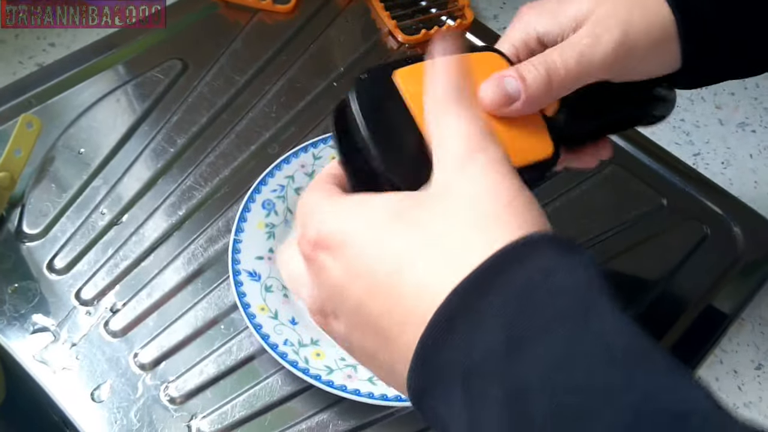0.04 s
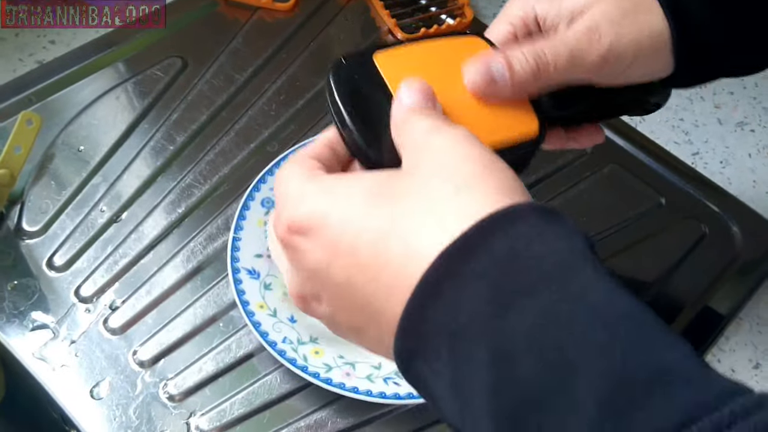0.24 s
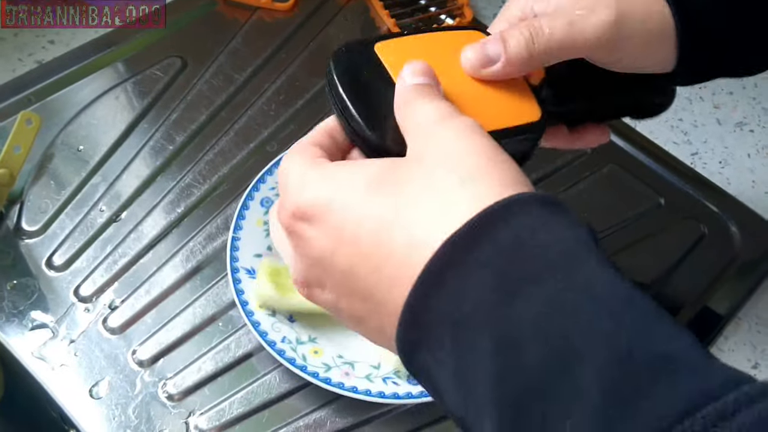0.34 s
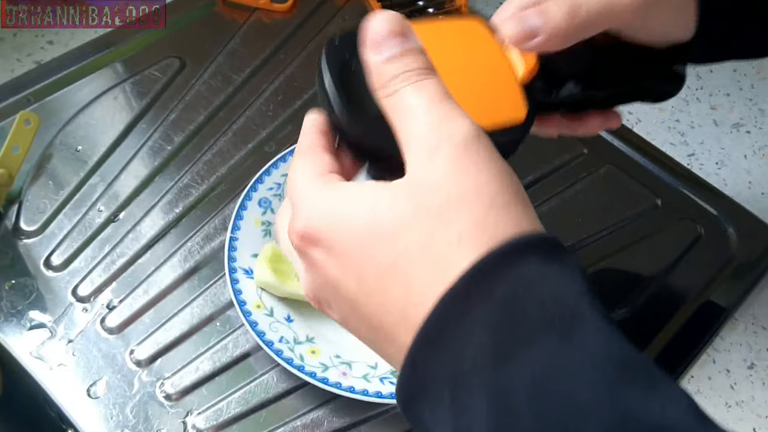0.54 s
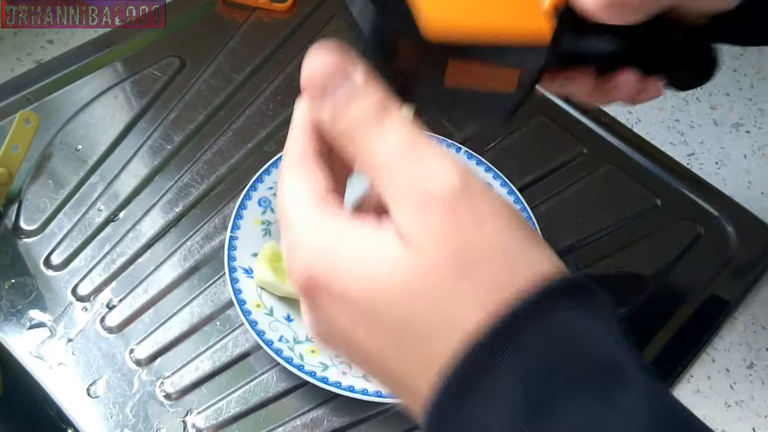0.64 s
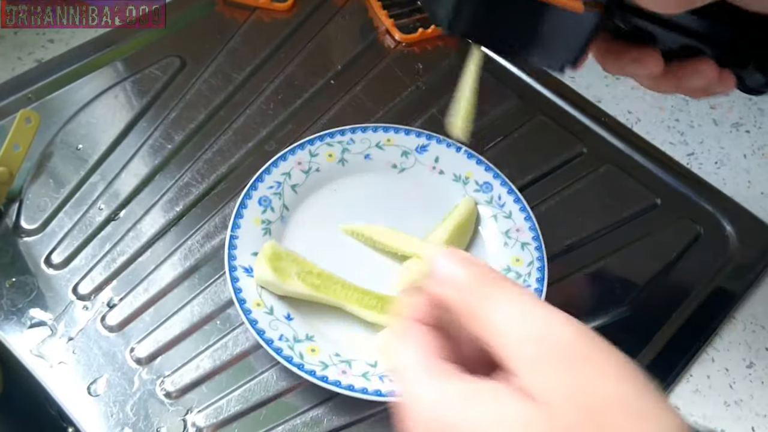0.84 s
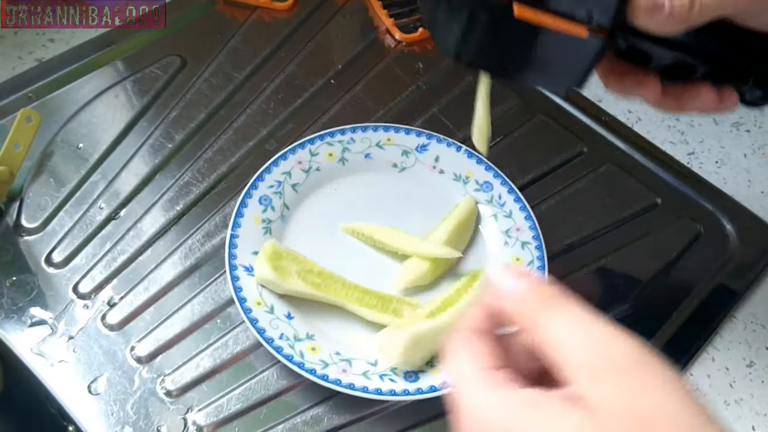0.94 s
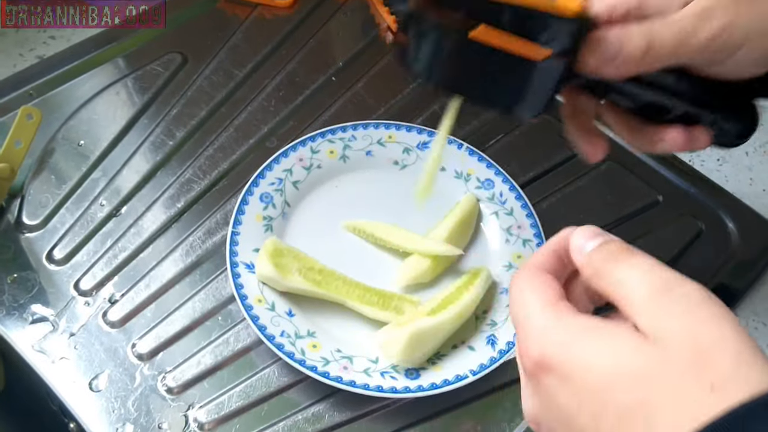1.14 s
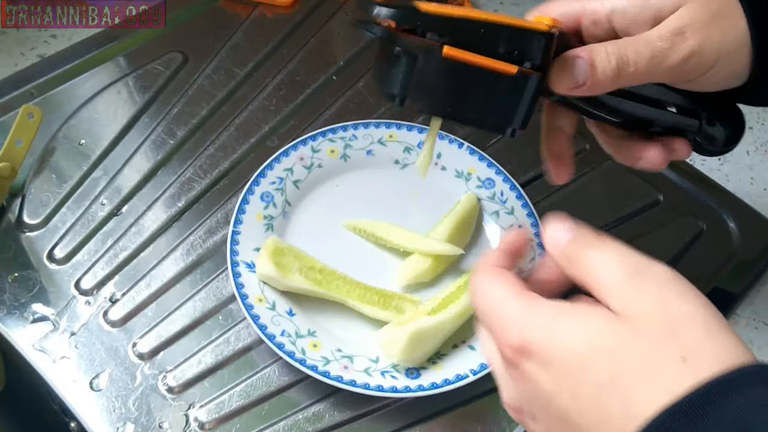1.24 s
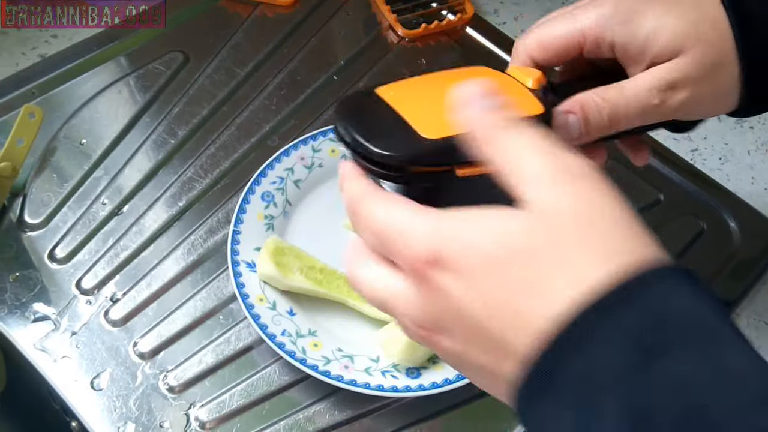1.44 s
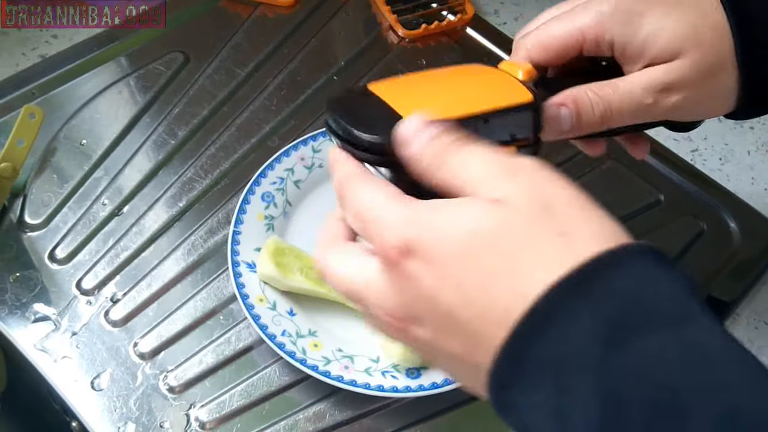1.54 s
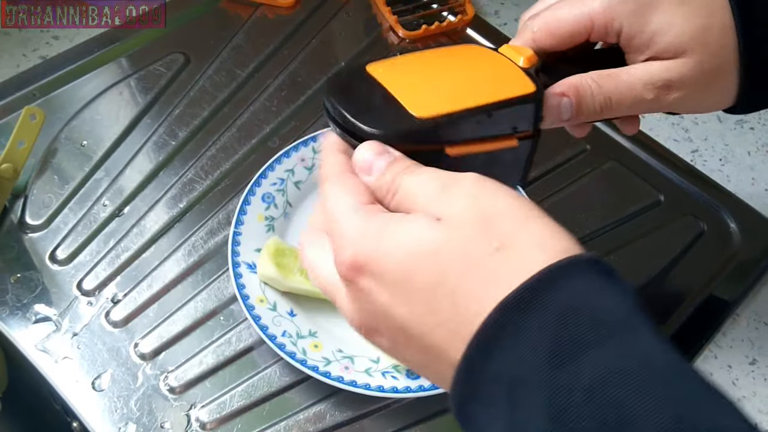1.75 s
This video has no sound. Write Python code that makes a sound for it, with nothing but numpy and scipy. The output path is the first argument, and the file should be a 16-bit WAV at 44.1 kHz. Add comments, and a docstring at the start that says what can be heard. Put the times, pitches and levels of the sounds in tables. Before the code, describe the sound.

A plastic hand slicer snaps and clacks shut through a cucumber, followed by faint ticks.

```python
"""A plastic hand slicer is pressed shut through a cucumber, over a steel sink in a small kitchen.
Over a low room rumble, the lid snaps loose at about 0.2 s. The blades crunch through the flesh,
bursting its cells, and near 0.4 s the lid slams home and the hollow body booms in its normal modes.
The low boom dies away faster from about 0.63 s. Around 1 s the wet slices rustle out,
and from 1.3 s the plastic ticks in the hand."""
import sys
import numpy as np
from scipy import signal
from scipy.fft import rfft, irfft, next_fast_len
from scipy.io import wavfile
from scipy.ndimage import uniform_filter1d

SR = 44100
rng = np.random.default_rng(int(sys.argv[2]) if len(sys.argv) > 2 else 0)


def dump_mix(stems):
    """Bounce the given channels to the path in sys.argv[1] as a 16-bit WAV at rate SR."""
    frames = np.atleast_2d(stems).T  # one column per channel
    limited = np.clip(frames, -1, 1)  # hard clip at full scale
    pcm = np.round(limited * 32767).astype(np.int16)
    wavfile.write(sys.argv[1], SR, pcm)


N = 79380
T = np.arange(N) / SR
FFT_SIZE = next_fast_len(2 * N)
HZ = np.fft.rfftfreq(FFT_SIZE, 1 / SR)

# kitchen reverberation (frequency [Hz], T60 [s])
KITCHEN_T60 = [(80, 0.72), (300, 0.5), (700, 0.43), (2500, 0.39), (6000, 0.31), (15000, .27)]
# likeness of left and right (frequency [Hz], correlation [0-1])
COHERENCE = [(50, 1), (250, 0.78), (600, 1), (1300, 0.16), (4000, 0.22), (15000, 0.047)]
# stereo balance (frequency [Hz], left minus right [dB])
BALANCE = [(60, -5), (200, -8), (380, -9.5), (750, -4), (2000, -5.5), (4400, -8), (8000, -5), (15000, -3)]

# spectra of the noisy sources (frequency [Hz], relative spectral density [dB])
RUMBLE_SPECTRUM = [(20, -28.5), (35, -14), (50, 3), (85, 1), (125, -8.5), (170, -4), (300, -14), (390, -21),
                   (480, -36), (650, -49), (1500, -61)]
HISS_SPECTRUM = [(400, -6.5), (1000, -3), (3000, -11), (10000, -10), (15000, -23.5)]
BUMP_SPECTRUM = [(25, -12.5), (60, 3), (100, 0.5), (160, -1), (300, -7), (480, -19), (900, -45.5)]
RUSTLE_SPECTRUM = [(2000, -34), (5000, -21), (6500, -3.5), (7600, -8.5), (9000, 0.5), (10500, -4.5),
                   (12500, -13.5), (15500, -32)]
TICK_SPECTRUM = [(1500, -23), (3800, -31), (4500, 1), (8500, -2), (11400, -5.5), (12300, -8), (14200, -11),
                 (15500, -18)]
KNOCK_SPECTRUM = [(25, -32.5), (60, -2), (110, -7), (200, 3.5), (320, -3), (500, -13), (900, -20),
                  (3000, -62)]
CUT_SPECTRUM = [(30, -25), (150, 1.5), (300, 8.5), (600, -1.5), (1200, -0.5), (2600, -1.5), (5200, -4),
                (9000, -6.5), (10600, -14.5), (12000, -26), (15500, -35.5)]
SNAP_SPECTRUM = [(59, -55), (100, -28), (293, -11), (614, -24), (1040, -9.5), (1230, -11.5), (2090, -5.5),
                 (2370, -7), (3390, -11.5), (5750, -6.5), (9340, -5), (15500, -33)]
SLAM_SPECTRUM = [(60, -23), (180, -6), (300, -4), (550, 3), (750, -5.5), (1150, -6), (1440, 0),
                 (1750, -12.5), (2200, 2), (3300, -9.5), (7000, -4.5), (9500, -7.5), (10800, -14),
                 (12200, -24.5), (15500, -35)]

# slow swell of the rumble (time [s], level [dB])
RUMBLE_LEVEL = [(0, -44.5), (.7, -50.5), (.82, -41.5), (.96, -47), (1.12, -45.5), (1.28, -48), (1.4, -51),
                (1.6, -45.5), (1.8, -52)]
# faint tones (peak time [s], width [s], frequency [Hz], level [dB])
HUM_SWELLS = [(0.718, 0.047, 870, -60), (.78, 0.08, 283, -48.5), (1.185, 0.0715, 376, -49.5),
              (1.16, 0.12, 400, -57)]
# hands shifting their grip (time [s], level [dB])
HAND_BUMPS = [(0.164, -33), (0.259, -26.5), (0.766, -35), (1.285, -37.5), (1.546, -46)]
# wet slices sliding (time [s], level [dB])
RUSTLE_LEVEL = [(.72, -68), (.8, -69), (.94, -61.5), (.98, -58.5), (1.03, -61.5), (1.08, -73), (1.13, -96)]
# plastic ticking (time [s], level [dB], rise [s], T60 [s], low ring [Hz], high ring [Hz])
PLASTIC_TICKS = [(1.277, -54.5, 0.0036, 0.034, 3900, 7270), (1.284, -53.5, 0.0015, 0.067, 2450, 5300),
                 (1.314, -56.5, 0.015, 0.3, 7130, 10200), (1.345, -53, 0.0049, 0.035, 4240, 5700),
                 (1.355, -47, 0.0051, 0.097, 5020, 8590), (1.44, -58, 0.0015, 0.044, 2070, 2900),
                 (1.444, -52, 0.0029, 0.081, 5080, 6840), (1.5, -60.5, 0.0058, 0.52, 5260, 9050),
                 (1.5409, -42, 0.0016, 0.058, 4780, 6570), (1.547, -42, 0.0069, 0.06, 3200, 8970)]
# resonances of handle and frame (frequency [Hz], relative level [dB])
FRAME_RESONANCES = [(4200, -2.5), (4730, -14), (5020, -8.5), (5735, 4.5), (6570, -1.5), (7340, 4.5),
                    (8600, -3), (9130, 5.5), (9870, -4), (10300, 2), (11190, -0.5), (14000, -14)]
# pushes on the hollow body (time [s], boom level [dB], knock level [dB])
PUSHES = [(.278, -23, -25.5), (0.312, -28, -18.5), (0.344, -30.5, -22.5), (.384, -17.5, -9),
          (0.4198, -24.5, -10), (0.4642, -34.5, -21.5)]
# modes of the hollow body (frequency [Hz], relative level [dB], T60 [s])
BODY_MODES = [(93.6, 3.5, 1.2), (186.2, -5.5, 0.69), (216.7, 1, 0.73), (254.7, -3.5, 0.57),
              (295.2, -2.5, 1.2), (381.4, -18.5, .33), (530, -9.5, 0.28), (629.6, -9, 0.66),
              (890, -21.5, 0.067), (991, -19.5, 0.88)]
# blades passing through the flesh (time [s], level [dB])
CUT_LEVEL = [(.255, -46.5), (.28, -28), (.315, -21), (.342, -19), (.362, -31.5), (.39, -20.5), (.42, -21.5),
             (.47, -23.5), (.52, -29), (.55, -52)]
# larger pieces of flesh and skin giving way (time [s], level [dB])
FRACTURES = [(0.2864, -15), (0.3069, -14), (0.3176, -14), (0.3423, -13), (0.3958, -13.5), (.4635, -16.5),
             (0.5221, -22)]
# latch letting go and catching (time [s], level [dB], band centre [Hz])
LATCH_CLICKS = [(0.205, -28, 7400), (0.2237, -10, 4400), (0.2273, -9.5, 5670), (0.2346, -7.5, 3254),
                (0.4202, -14.5, 7050)]
# resonances of the lid (frequency [Hz], relative level [dB])
LID_RESONANCES = [(2100, -7.5), (2250, 1), (2983, -5.5), (3850, -1), (4533, -4.5), (5790, -2.5), (5957, -1),
                  (7340, 0), (8190, -6)]
# lid snapping loose, then striking the frame (time [s], level [dB], T60 [s])
LID_SNAPS = [(.1632, -20, 0.064), (.2185, -22.5, 0.096), (.2245, -8.5, 0.045), (.2362, -5.5, 0.059)]
LID_SLAMS = [(.333, -19.5, 0.034), (.395, -17.5, 0.048), (.4205, -11.5, 0.17), (.436, -10, 0.057),
             (.511, -20.5, 0.035)]


def amp(db):
    """Amplitude ratio: tenfold for every 20 dB."""
    return 10 ** (np.asarray(db) / 20)


def unit(x):
    """Normalisation to an rms of 1."""
    return x / np.sqrt(np.mean(x ** 2) + 1e-20)


def at_frequency(points, hz):
    """Interpolation on a logarithmic frequency axis."""
    table_hz, values = np.transpose(points)
    return np.interp(np.log(hz + 1), np.log(table_hz + 1), values)


def level_curve(points):
    """Amplitude envelope interpolated in decibels, silent outside its span."""
    times, db = np.transpose(points)
    return amp(np.interp(T, times, db)) * (T > times[0]) * (T < times[-1])


def strike(start, rise, t60):
    """Transient envelope: a quick rise and an exponential decay of 60 dB in t60 seconds."""
    age = np.maximum(T - start, 0)
    return (1 - np.exp(-age / rise)) * np.exp(-np.log(1000) * age / t60)


def grit(spread_db):
    """Random amplitude modulation: stereo noise whose strength jumps about every millisecond."""
    grain = amp(spread_db * unit(uniform_filter1d(rng.standard_normal(N), size=40)))
    return unit(rng.standard_normal((2, N)) * grain)


def wandering_tone(hz, width_hz):
    """Narrow-band noise is heard as a tone of wandering strength and phase."""
    spectrum = rfft(rng.standard_normal(N), FFT_SIZE) * np.exp(-((HZ - hz) / width_hz) ** 2 / 2)
    band = signal.hilbert(irfft(spectrum, FFT_SIZE))[:N]
    return unit(band.real / np.sqrt(abs(band) + 1e-12))


def colour(x, spectrum):
    """Minimum-phase filtering: causal, and keeps the power of white noise."""
    log_gain = np.log(np.maximum(unit(amp(at_frequency(spectrum, HZ))), 1e-5))
    cepstrum = irfft(log_gain, FFT_SIZE)[:FFT_SIZE // 2]
    response = np.exp(rfft(2 * cepstrum, FFT_SIZE) - cepstrum[0])
    return irfft(rfft(x, FFT_SIZE) * response, FFT_SIZE)[:, :N]


def resonate(x, modes, width_hz):
    """Forced resonance of parallel modes, keeping roughly the power of white noise."""
    ring = 0
    for k, (hz, db) in enumerate(modes):
        resonator = signal.iirpeak(hz, hz / width_hz, fs=SR)
        ring += (-1) ** k * amp(db) * signal.lfilter(*resonator, x + 1e-18)
    return ring / np.sqrt(sum(amp(db) ** 2 for _, db in modes) * np.pi * width_hz / SR)


def cohere(x):
    """Spatial coherence: two nearby points receive much the same bass but unrelated treble."""
    spectra = rfft(x, FFT_SIZE)
    angle = np.arcsin(np.clip(at_frequency(COHERENCE, HZ), 0, 1)) / 2
    return irfft(spectra * np.cos(angle) + spectra[::-1] * np.sin(angle), FFT_SIZE)[:, :N]


def kitchen(x, wet_db, build_s):
    """Reverberation: a diffuse tail builds up, then dies soonest in the treble."""
    hz, age, spectra = signal.stft(rng.standard_normal((2, N)), SR, nperseg=256)
    decay = np.exp(-np.log(1000) * age / at_frequency(KITCHEN_T60, hz)[:, None])
    tail = signal.istft(spectra * decay, SR, nperseg=256)[1][:, :N]
    tail = unit(tail * (1 - np.exp(-(T / build_s) ** 2))) / np.sqrt(N)
    return x + amp(wet_db) * signal.fftconvolve(x, tail, axes=1)[:, :N]


def background():
    """Ambient noise: a swelling rumble, a thin hiss and faint narrow-band hums."""
    swell = amp(np.interp(T, *np.transpose(RUMBLE_LEVEL)))
    rumble = swell * colour(rng.standard_normal((2, N)), RUMBLE_SPECTRUM)
    hiss = amp(-67) * colour(rng.standard_normal((2, N)), HISS_SPECTRUM)
    hums = sum(amp(db) * np.exp(-((T - peak) / width) ** 2) * wandering_tone(hz, width_hz=6.0)
               for peak, width, hz, db in HUM_SWELLS)
    return cohere(rumble + hiss) + hums


def hand_bumps():
    """Soft impacts carry mostly low frequencies: the hands thud as they shift their grip."""
    envelope = sum(amp(db) * strike(start, rise=0.0038, t60=0.04) for start, db in HAND_BUMPS)
    return colour(envelope * rng.standard_normal((2, N)), BUMP_SPECTRUM)


def slice_rustle():
    """Sliding friction: the wet slices give a high, grainy noise as they slip out."""
    return colour(level_curve(RUSTLE_LEVEL) * grit(spread_db=1.8), RUSTLE_SPECTRUM)


def plastic_ticks():
    """Frictional excitation: small scrapes ring the frame and two hollow spots near the fingers."""
    grip_detune, grip_spread_db = 0.012, 3  # the grip alters the frame's modes from tick to tick
    scrapes, rings = np.zeros((2, 2, N))
    friction = grit(spread_db=1.37)
    grips = rng.uniform(-1, 1, (len(PLASTIC_TICKS), len(FRAME_RESONANCES) + 1))
    for (start, db, rise, t60, low_hz, high_hz), (shift, *offsets) in zip(PLASTIC_TICKS, grips):
        scrape = friction * amp(db) * strike(start, rise, t60)
        frame_modes = [(hz * (1 + grip_detune * shift), mode_db + grip_spread_db * offset)
                       for (hz, mode_db), offset in zip(FRAME_RESONANCES, offsets)]
        rings += resonate(scrape, frame_modes, width_hz=110)
        rings += resonate(scrape, [(low_hz, 0), (high_hz, 0)], width_hz=79)
        scrapes += scrape
    ticks = rings + amp(-2.5) * colour(scrapes, TICK_SPECTRUM)
    return kitchen(ticks, wet_db=-4.5, build_s=0.01)


def body_knocks():
    """Impact noise: the dull, toneless part of each push."""
    envelope = sum(amp(db) * strike(start, rise=0.0015, t60=0.12) for start, _, db in PUSHES)
    knocks = colour(envelope * grit(spread_db=0.93), KNOCK_SPECTRUM)
    return kitchen(knocks, wet_db=-6.5, build_s=0.018)


def body_boom():
    """Modal superposition: each push rings the hollow body; the boom dies away faster from 0.63 s."""
    rise_s, fade_start_s, fade_db_per_s = 0.0051, 0.63, 160
    ring = np.zeros(N)
    for start, push_db, _ in PUSHES:
        for hz, mode_db, t60 in BODY_MODES:
            envelope = amp(push_db + mode_db) * strike(start, rise_s, t60)
            ring += envelope * np.sin(2 * np.pi * hz * (T - start))
    return ring * amp(-fade_db_per_s * np.maximum(T - fade_start_s, 0))


def cucumber_crunch():
    """Shot noise: countless cells burst under the blades; now and then a larger piece gives way."""
    cells_per_s, size_spread_db = 6000, 5
    sizes = amp(size_spread_db * np.minimum(rng.exponential(1, (2, N)), 4))
    signs = rng.choice([-1, 1], (2, N))
    bursting = rng.random((2, N)) < cells_per_s / SR
    fracture_power = sum((amp(db) * strike(start, rise=0.000067, t60=0.011)) ** 2
                         for start, db in FRACTURES)
    envelope = np.sqrt(level_curve(CUT_LEVEL) ** 2 + fracture_power)
    crunch = colour(unit(sizes * signs * bursting) * envelope, CUT_SPECTRUM)
    return kitchen(crunch, wet_db=-3.5, build_s=0.0071)


def catch_ring():
    """Free vibration: one mode of the catch rings briefly at the end of the stroke."""
    start, hz = 0.4205, 1447
    return amp(-15.5) * strike(start, rise=0.001, t60=0.17) * np.sin(2 * np.pi * hz * (T - start))


def latch_clicks():
    """Brief contact gives a broad band: the hard edges of the latch let go and catch."""
    noise = rng.standard_normal((2, N))
    clicks = np.zeros((2, N))
    for start, db, hz in LATCH_CLICKS:
        burst = noise * amp(db) * strike(start, rise=0.000095, t60=0.016)
        clicks += resonate(burst, [(hz, 0)], width_hz=2600)
    return colour(clicks, SNAP_SPECTRUM)


def lid_impacts(impacts, spectrum, detune):
    """Impact excitation: gritty bursts add in power and ring the lid's modes."""
    power = sum((amp(db) * strike(start, rise=0.0016, t60=t60)) ** 2 for start, db, t60 in impacts)
    bursts = np.sqrt(power) * grit(spread_db=-0.6)
    modes = [(hz * (1 + detune), db) for hz, db in LID_RESONANCES]
    return colour(bursts, spectrum) + amp(-7.5) * resonate(bursts, modes, width_hz=36)


def lid():
    """Contact shifts resonances: the lid snaps loose brightly, then clacks lower against the frame."""
    snaps = lid_impacts(LID_SNAPS, SNAP_SPECTRUM, detune=0) + latch_clicks()
    snaps = kitchen(snaps, wet_db=-3.5, build_s=0.0031)
    slams = lid_impacts(LID_SLAMS, SLAM_SPECTRUM, detune=-0.028)
    return snaps + kitchen(slams, wet_db=-4.0, build_s=0.0082)


def scene():
    """Superposition of all sources; a higher level on the right places them to that side."""
    stroke = cohere(lid() + cucumber_crunch() + body_knocks() + hand_bumps())
    handling = cohere(plastic_ticks() + slice_rustle())
    mix = stroke + body_boom() + catch_ring() + handling + background()
    half_db = at_frequency(BALANCE, HZ) / 2
    gains = amp([half_db, -half_db])
    gains /= np.sqrt(np.mean(gains ** 2, axis=0))  # constant total power
    return irfft(rfft(mix, FFT_SIZE) * gains, FFT_SIZE)[:, :N]


def suppress_noise(x):
    """Spectral gating: every faint frequency is lowered, which cuts the tails short."""
    threshold_db, depth_db, smoothing_s = -80, -7, 0.0067
    window, hop = 512, 128
    spectra = signal.stft(x, SR, nperseg=window, noverlap=window - hop)[2]
    memory = np.exp(-hop / SR / smoothing_s)
    power = signal.lfilter([1 - memory], [1, -memory], np.mean(abs(spectra) ** 2, axis=0), axis=1)
    opening = power ** 2 / (power ** 2 + amp(2 * threshold_db) ** 2)
    gated = spectra * amp(depth_db * (1 - opening))
    return signal.istft(gated, SR, nperseg=window, noverlap=window - hop)[1][:, :N]


def record(dry):
    """Noise suppression, hard clipping of the loudest peaks, then band limiting."""
    clipped = np.clip(suppress_noise(dry), -0.95, 0.95)
    lowpass = signal.firwin(511, cutoff=15750, window=("kaiser", 9), fs=SR)
    return signal.oaconvolve(clipped, lowpass[None], "same")


dry = scene()
out = record(dry)
dump_mix(out)
```